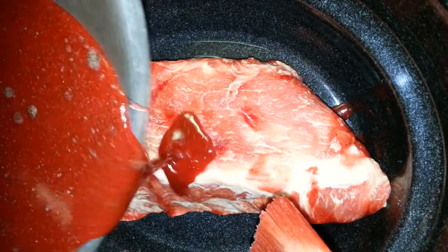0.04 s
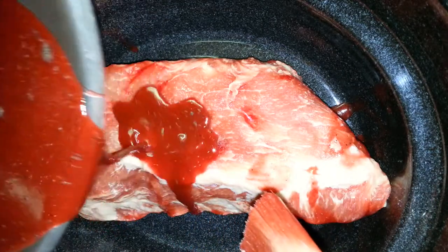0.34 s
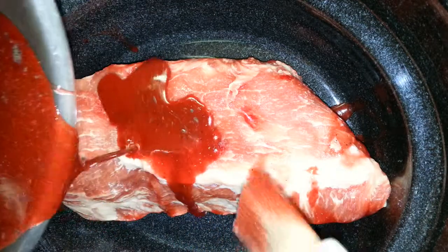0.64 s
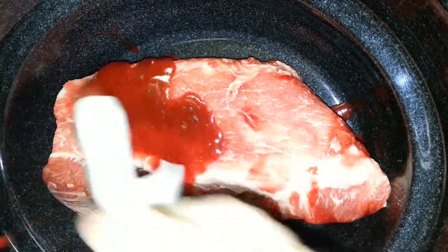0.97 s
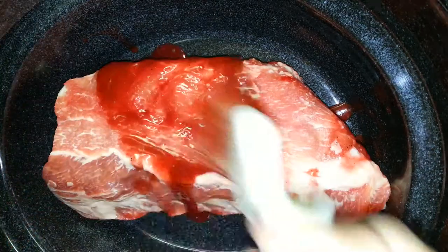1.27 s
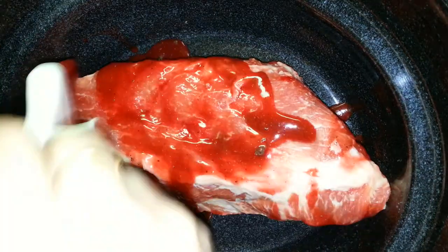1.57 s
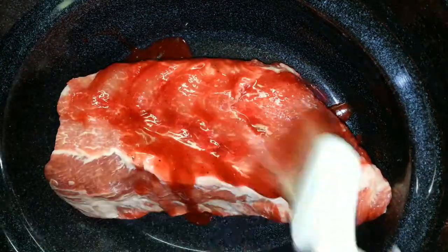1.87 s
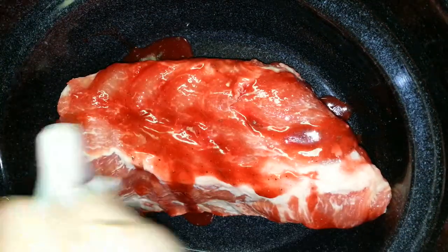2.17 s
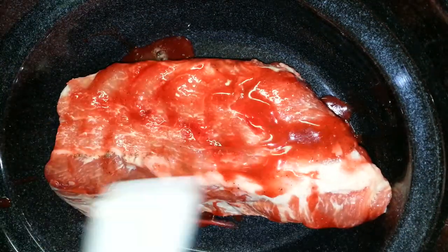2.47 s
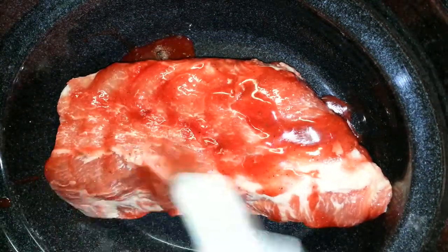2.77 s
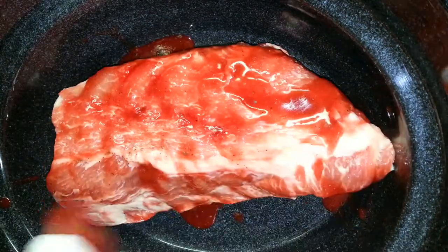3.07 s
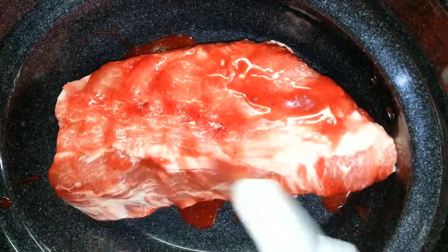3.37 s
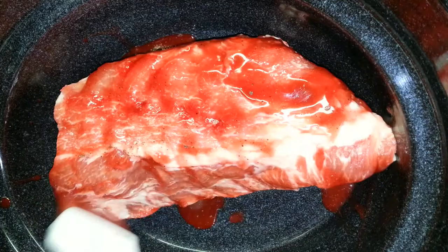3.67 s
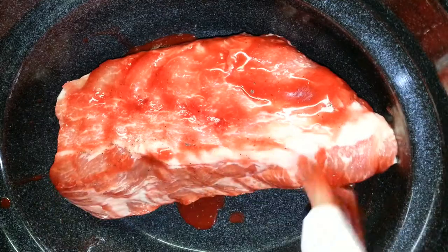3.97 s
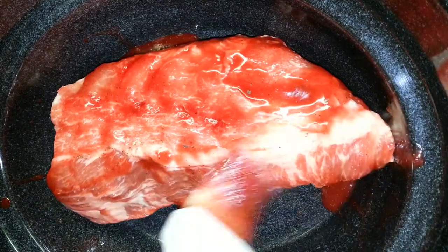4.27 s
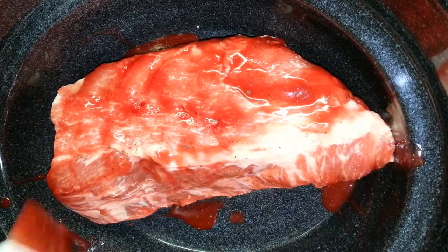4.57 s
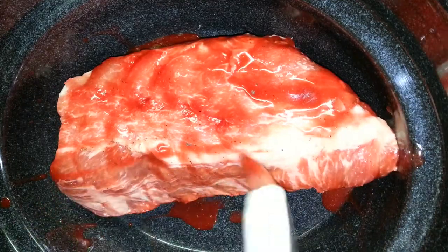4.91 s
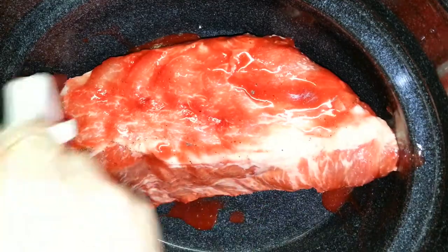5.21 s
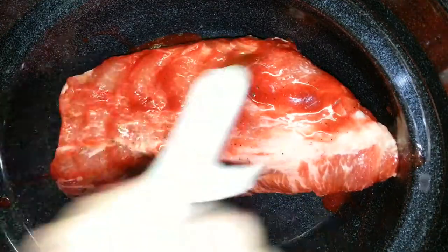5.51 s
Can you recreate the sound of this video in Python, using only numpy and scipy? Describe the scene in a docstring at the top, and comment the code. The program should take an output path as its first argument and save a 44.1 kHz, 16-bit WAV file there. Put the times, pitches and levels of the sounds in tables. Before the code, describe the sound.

Sticky squelches and crisp little snaps as a pastry brush dabs sauce onto meat, with soft knocks on a crock.

```python
"""In a kitchen, close up, a pastry brush spreads thick sauce over raw ribs in a glazed crock.
Each stroke crackles as bristles pull out of the sauce, while wet pockets pop and the meat rubs dully.
Tufts squelch, films of sauce snap, and twice a thin hiss slips in between strokes.
The brush bumps the crock, making it ring, and once judders along it. An appliance hums throughout."""
import sys
import numpy as np
from scipy import signal
from scipy.fft import rfft, irfft
from scipy.io import wavfile
from scipy.ndimage import uniform_filter1d

SR = 44100
rng = np.random.default_rng(int(sys.argv[2]) if len(sys.argv) > 2 else 0)


def wrap_up_sound(samples):
    """Save the sound to the file named by the first command line argument, as 16-bit audio."""
    columns = np.atleast_2d(samples).T
    # keep every value between -1 and 1, then stretch to whole-number steps
    tamed = np.clip(columns, -1, 1)
    steps = np.round(tamed * 32767).astype(np.int16)
    wavfile.write(sys.argv[1], SR, steps)


N = 249165
TIME = np.arange(N) / SR
FFT_SIZE = 2 ** 18
FREQS = np.maximum(np.arange(FFT_SIZE // 2 + 1) * SR / FFT_SIZE, 1)
SUDDEN_DB_PER_S = 7000   # how fast a dab or a judder starts


def from_db(db):
    return 10 ** (np.asarray(db) / 20)


def rms_one(x):
    """Scale a sound to an average power of 1."""
    return x / np.sqrt(np.mean(x ** 2) + 1e-20)


def panned(left_db):
    """Left and right gains, with the left louder by left_db."""
    return from_db(np.vstack([left_db, -left_db]) / 2)


def add(out, s, sound):
    """Mix a short sound in at time s."""
    start = int(s * SR)
    out[:, start:start + sound.shape[-1]] += sound[..., :N - start]


def colour(x, spectrum):
    """Shape the tone to follow (pitch, level) points, with a minimum-phase filter."""
    hz, db = np.transpose(spectrum)
    gain = from_db(np.interp(np.log(FREQS), np.log(hz), db))
    cepstrum = irfft(np.log(gain))
    cepstrum[1:FFT_SIZE // 2] *= 2
    cepstrum[FFT_SIZE // 2 + 1:] = 0   # nothing rings before its cause
    return irfft(rfft(x, FFT_SIZE) * np.exp(rfft(cepstrum)))[..., :N]


def keep_side(x, hz, kind):
    """Keep the "low" or the "high" side of a pitch."""
    return signal.sosfilt(signal.butter(2, hz, kind, fs=SR, output="sos"), x + 1e-18)


def resonate(x, hz, width_hz):
    """Ring at one pitch; a narrower width rings longer."""
    r = np.exp(-np.pi * width_hz / SR)
    feedback = [1, -2 * r * np.cos(2 * np.pi * hz / SR), r * r]
    return signal.lfilter(np.array([1, 0, -1]) * (1 - r * r) / 2, feedback, x + 1e-18)


def drift(per_s):
    """A random wander, about 1 either side of zero."""
    knots = rng.standard_normal(N // 20)
    return np.interp(TIME * per_s, np.arange(len(knots)), knots)


def stereo_noise(side_db):
    """Hiss that sounds wider as side_db rises."""
    mid, side = rng.standard_normal((2, N))
    return mid + from_db(side_db) * side * [[1], [-1]]


def with_echoes(x, wall_db, wall_t60, room_db, room_t60=0.17, size=6000):
    """Sound arrives directly, off the crock's walls and round the kitchen; t60 is seconds to fade 60 dB."""
    t, paths = TIME[:size], 0
    for db, t60 in ((wall_db, wall_t60), (room_db, room_t60)):
        tail = rng.standard_normal((2, size)) * from_db(-60 * t / t60) * (t > 0.0005)
        paths = paths + from_db(db) * rms_one(tail) / np.sqrt(size)
    paths[[0, 1], rng.integers(0, 10, 2)] += 1   # the direct path to each side
    return signal.oaconvolve(x[None], paths, axes=1)[:, :N]


def grains(per_s, spread_db):
    """Tiny bursts at random moments, most weak and a few strong."""
    sizes = from_db(spread_db * np.minimum(rng.exponential(1, N), 4)) * rng.choice([-1, 1], N)
    return rms_one(sizes) * (rng.random(N) < per_s / SR) * np.sqrt(SR / per_s)


def peak_at(s, rise_db_per_s, fall_db_per_s, hold_s=0):
    """A level in dB that rises to 0 at time s, holds and falls."""
    rise = np.minimum(TIME - s, 0) * rise_db_per_s
    fall = np.maximum(TIME - s - hold_s, 0) * fall_db_per_s
    return np.maximum(rise - fall, -200)


# the tones in the hum: (multiple of the mains pitch, level [dB])
HUM_TONES = [(1, -25), (2, -1.5), (3, -9.5), (4, 3), (5, -28), (6, -7), (7, -10), (8, -29)]
# the tone of the room noise: (pitch [Hz], level [dB])
ROOM_TONE = [(20, -17.5), (55, 1), (130, -10.5), (300, -6.5), (480, -17), (700, -23), (1500, -29.5),
             (3000, -32), (7000, -38), (14000, -27.5)]


def kitchen(mains_hz=59.68, hum_db=-61.5, room_db=-60):
    """An appliance hums with the mains current, over faint room noise."""
    hum = 0
    for multiple, db in HUM_TONES:
        lag_s = 0.0004 * rng.standard_normal()
        tone = np.sin(2 * np.pi * multiple * (mains_hz * TIME + lag_s))
        hum = hum + tone * from_db(db + 1.6 * drift(9))
    room = rms_one(colour(stereo_noise(side_db=-9), ROOM_TONE))
    return np.sqrt(2) * hum * from_db(hum_db) + room * from_db(room_db)


# brush strokes: (lands [s], presses hardest [s], lifts [s], crackle [dB], smear [dB], meat drag [dB],
# brightness [dB per octave], left over right [dB])
BRUSH_STROKES = [(0.999, 1.298, 1.455, -37.5, -52, -52, -2, 1.5),
                 (1.667, 1.789, 1.963, -32, -45.5, -52, -0.5, 0), (2.193, 2.307, 2.48, -31, -45, -46, 0, 0),
                 (2.724, 2.791, 2.99, -31, -46.5, -54, 2, -2),
                 (3.264, 3.331, 3.48, -29, -46.5, -51.5, 2.5, -1),
                 (3.805, 3.829, 3.958, -26, -44, -47.5, 2, .5), (4.223, 4.418, 4.56, -33, -48, -57, 3, -3),
                 (4.768, 4.84, 4.96, -28, -43, -53, 3, -1), (5.246, 5.426, 5.58, -33, -49, -54, -1, 1)]


def strokes(landing_db=-14.5, lifting_db=-14, brightening_per_s=12.5):
    """Levels, brightness and left-right balance over time, as the brush lands, presses and lifts."""
    levels = np.full((3, N), -120.0)
    tilts, pans = [], []
    for lands, hardest, lifts, crackle_db, smear_db, drag_db, tilt_db, left_db in BRUSH_STROKES:
        # a power under 1 makes the pressure drop quickly either side of its peak
        off_peak = np.interp(TIME, [lands, hardest, lifts], [1, 0, 1]) ** 0.82
        pressure = off_peak * np.where(TIME < hardest, landing_db, lifting_db)
        pressure += peak_at(lands, rise_db_per_s=501, fall_db_per_s=257, hold_s=lifts - lands)
        stroke = [crackle_db + pressure, smear_db + 0.85 * pressure, drag_db + 0.48 * pressure]
        levels = np.maximum(levels, stroke)
        # the sauce thins along a stroke, so it sounds brighter
        tilts += [(s, tilt_db + brightening_per_s * (s - hardest)) for s in (lands, lifts)]
        pans.append((hardest, left_db))
    return *levels, np.interp(TIME, *np.transpose(tilts)), np.interp(TIME, *np.transpose(pans))


def bristles(level_db, tilt_db, left_db):
    """Bristles peel out of the sauce with a crackle; pressing harder frees more of them."""
    per_s = 340 * from_db(0.5 * (np.maximum(level_db, -55) + 36))
    out = 0
    for hz in np.geomspace(3300, 13500, num=16):
        crackle = resonate(grains(per_s, spread_db=2.5), hz, 0.14 * hz)
        crackle = resonate(crackle, hz, 0.61 * hz)
        shifting_db = 3.8 * drift(60)   # the pockets of sauce keep changing size
        crackle *= from_db(shifting_db + (tilt_db - 1) * np.log2(hz / 6500))
        out = out + with_echoes(crackle, wall_db=0, wall_t60=0.028, room_db=-15)
    clumps_db = 2.15 * drift(120)
    return rms_one(out) * from_db(level_db + clumps_db - 12) * panned(left_db)


def ticks(level_db):
    """Now and then a single sticky bristle lets go with a crisp tick."""
    clicks = resonate(grains(70, spread_db=3), hz=7000, width_hz=8000) * from_db(level_db - 16.5)
    return with_echoes(clicks, wall_db=-6, wall_t60=0.03, room_db=-20.5)


# the tone of sauce popping in the crock: (pitch [Hz], level [dB])
SMEAR_TONE = [(250, -11.5), (480, -3.5), (680, -8.5), (940, 4), (1150, -7), (1380, 1.5), (1580, -2),
              (1850, 0.5), (2450, 0.5), (3200, 2), (5000, -30.5)]


def smear(level_db):
    """Larger pockets of sauce open and sound in the hollow of the crock, each size in its own bursts."""
    out = 0
    for hz in np.geomspace(450, 3200, num=11):
        pops = resonate(grains(300, spread_db=4), hz, 0.15 * hz)
        pops *= from_db(4.35 * drift(40)) / np.sqrt(hz)
        out = out + with_echoes(pops, wall_db=6.5, wall_t60=0.019, room_db=-1)
    return rms_one(colour(out, SMEAR_TONE)) * from_db(level_db - 4.5)


# the tone of rubbed meat: (pitch [Hz], level [dB])
MEAT_TONE = [(25, -35.5), (60, -3.5), (100, 8), (220, -3.5), (330, 6), (480, -14), (700, -13.5),
             (1500, -38)]


def meat_drag(level_db):
    """The brush drags over the meat with a low, dull rub."""
    rubbing = colour(stereo_noise(side_db=-14), MEAT_TONE)
    return rms_one(rubbing) * from_db(level_db - 4.5)


# tufts peeling off the sauce: (peak time [s], crackle [dB], smear [dB], swell [dB per s])
PEELING_TUFTS = [(1.08, -42, -51.5, 150), (1.278, -30, -49.5, 350), (1.718, -37, -46, 202),
                 (1.921, -25.5, -42.5, 279), (2.293, -26.5, -41, 450), (2.801, -26, -40, 449.5),
                 (2.962, -35, -45, 250), (3.348, -24, -46, 350), (3.814, -26.5, -47, 900),
                 (4.507, -29.5, -46, 199), (4.835, -25, -42, 500), (5.357, -23, -40, 800),
                 (5.394, -19, -36, 599.5), (5.51, -29.5, -45.5, 298.5)]


def squelches(let_go_db_per_s=546.5):
    """Crackle and smear levels that swell as a tuft of bristles peels off, then drop as it lets go."""
    return np.max([np.vstack(levels) + peak_at(s, swell, let_go_db_per_s)
                   for s, *levels, swell in PEELING_TUFTS], axis=0)


# films of sauce snapping: (time [s], strength [dB], pitch [Hz], left over right [dB])
FILM_SNAPS = [(1.1464, -28, 4600, 0), (1.346, -20.5, 10100, -5), (1.3657, -20, 10200, -2),
              (1.417, -28.5, 5830, 1), (1.4772, -28, 11700, -4), (1.649, -29, 5040, -1),
              (1.777, -6.5, 4900, 9), (1.8216, -1, 8970, 8), (1.8262, -11, 7040, 9),
              (1.8665, -24, 5230, 11), (1.875, -19.5, 4550, -2), (2.3644, -9, 5540, 1),
              (2.37, -7.5, 4570, 6.5), (2.6876, -18, 6700, 5), (2.7611, -18.5, 7860, -3),
              (2.7956, -16.5, 7160, 0), (2.8, -15.5, 7800, 6), (2.8376, -8.5, 10600, -1),
              (3.2332, -22.5, 10800, -4.5), (3.2705, -16.5, 9800, -1), (3.332, -18, 8800, -14.5),
              (3.382, -17, 7000, -9), (3.5067, -32, 6300, 0), (3.7308, -25, 5906, 7.5),
              (3.8376, -13.5, 7200, -3), (3.851, -17.5, 7600, -5), (3.8852, -19.5, 6900, 0),
              (3.893, -14, 10800, -6), (3.9367, -39, 7700, 7), (4.0087, -30.5, 7240, -11),
              (4.381, -19.5, 5860, -5), (4.4, -18, 5200, -2), (4.4573, -16.5, 7200, -5),
              (4.808, -12.5, 5760, -3), (4.8278, -9, 5200, -1), (4.8941, -13.5, 10600, -2),
              (5.2618, -29, 10200, 1), (5.4472, -16, 5670, -4), (5.4517, -16.5, 7700, 0),
              (5.4822, -13, 5360, 7), (5.5105, -14, 6400, 4.5)]


def snaps(size=300):
    """A film of sauce tears within a millisecond and rings its small pocket, with a faint lower smack."""
    out, t = np.zeros((2, N)), TIME[:size]
    for s, db, hz, left_db in FILM_SNAPS:
        tear = signal.unit_impulse(size) + 0.39 * rng.standard_normal(size) * np.exp(-t / 0.00022)
        pocket = resonate(resonate(tear, hz, width_hz=4200), hz, width_hz=11550)
        smack = resonate(tear, hz=2300, width_hz=1500)
        snap = pocket + from_db(-13) * smack
        heard = with_echoes(snap / np.linalg.norm(snap), wall_db=-1.5, wall_t60=0.038, room_db=-17.5)
        add(out, s, heard * from_db(db - 1) * panned(left_db))
    return out


# the crock's notes, damped by the meat: (pitch [Hz], level [dB], time to fade 60 dB [s])
CROCK_NOTES = [(110, -24, 0.053), (185.3, -12.5, 0.32), (272.6, -0.5, 0.095), (350, -0.5, 0.026),
               (478, 4, 0.041), (582, 4, 0.017), (732, -6, 0.052), (854, -1.5, 0.046), (913.5, 2.5, 0.048),
               (1182, -22, 0.098), (1320, -7.5, 0.046), (1643, -20, 0.036), (1942, 1, 0.043)]
# bumps on the crock: (time [s], peak level [dB], treble limit [Hz], bass limit [Hz])
BRUSH_BUMPS = [(1.214, -38, 138, 60), (1.333, -39.5, 1010, 710), (1.69, -36, 774, 380),
               (1.777, -25, 1040, 756), (1.824, -33.5, 1020, 626), (1.866, -29.5, 1600, 500),
               (2.212, -18.5, 358, 189), (2.216, -27.5, 173, 115), (2.229, -25.5, 300, 160),
               (2.268, -27, 338, 192), (2.388, -37, 300, 150), (2.447, -35, 337, 150),
               (2.68, -44, 307, 150), (2.798, -39.5, 1490, 900), (2.891, -17, 443, 210),
               (3.263, -26.5, 1430, 337), (3.28, -34, 1940, 414), (3.744, -35.5, 820, 286),
               (4.769, -21.5, 1850, 347), (4.796, -36.5, 132, 70.6), (4.806, -33.5, 161, 80),
               (5.098, -57, 1004, 384), (5.355, -38.5, 1095, 840), (5.385, -46, 920, 920),
               (5.447, -37.5, 1600, 900)]


def bumps(size=11000):
    """The brush bumps the crock through the meat and rings all its notes, each with its own strength."""
    out, t = np.zeros((2, N)), TIME[:size]
    hz, db, t60 = np.array(CROCK_NOTES).T[:, :, None]
    for s, peak_db, treble_hz, bass_hz in BRUSH_BUMPS:
        strength = from_db(db + 1.5 * rng.standard_normal(hz.shape))
        notes = strength * from_db(-60 * t / t60) * np.sin(2 * np.pi * hz * t)
        ring = keep_side(keep_side(notes.sum(0), treble_hz, "low"), bass_hz, "high")
        heard = with_echoes(ring, wall_db=-14, wall_t60=0.018, room_db=-12.5)
        add(out, s, heard / np.abs(heard).max() * from_db(peak_db))
    return out


# hisses between strokes: (peak time [s], length [s], pitch [Hz], glide [Hz per s], level [dB])
THIN_HISSES = [(1.463, 0.1, 5890, -11000, -58.5), (2.151, 0.31, 5850, 3699, -59)]


def hisses():
    """A thin, gliding hiss swells and fades."""
    rumble = rms_one(keep_side(stereo_noise(side_db=-3.5), 450, "low"))
    tones = 0
    for s, length_s, hz, glide, db in THIN_HISSES:
        t = TIME - s
        swell = np.exp(-np.minimum((2 * t / length_s) ** 2, 20))
        tones = tones + np.sin(2 * np.pi * (hz + glide * t / 2) * t) * swell * from_db(db - 3.5)
    return rumble * tones   # multiplying moves the noise up to each tone's pitch


# light touches of the brush: (time [s], crackle [dB], smear [dB], fade [dB per s])
LIGHT_DABS = [(1.647, -36, -47.5, 449.5), (2.106, -47.5, -61, 88.5), (2.52, -49, -61.5, 66.5),
              (2.686, -46, -55, 250), (3.212, -46.5, -60, 130), (3.504, -44, -57.5, 191.5),
              (3.729, -45, -49.5, 223), (4.007, -41, -54, 190.5), (4.175, -48.5, -64.5, 20),
              (4.606, -42, -57, 191.5), (4.70, -53, -65, 61), (5.097, -37.5, -50, 130),
              (5.175, -44.5, -59.5, 59.5), (5.259, -41, -53, 101), (5.599, -45.5, -65.5, 89.5)]


def dabs():
    """Crackle and smear levels that jump as the brush dabs the sauce, then die away."""
    return np.max([np.vstack(levels) + peak_at(s, SUDDEN_DB_PER_S, fade)
                   for s, *levels, fade in LIGHT_DABS], axis=0)


def judder(start_s=2.891, hz=488, db=-40):
    """The brush sticks and slips in step with one note of the crock: a short, rough groan."""
    level_db = db + peak_at(start_s, SUDDEN_DB_PER_S, fall_db_per_s=260, hold_s=0.099)
    phase = 2 * np.pi * np.cumsum(hz * (1 + 0.055 * drift(700))) / SR
    overtones = sum(np.sin(k * phase) * (0.5 + 0.8 * drift(150)) for k in (2, 3, 4))
    groan = (np.sin(phase) + from_db(-22) * overtones) * from_db(3 * drift(130))
    slips = resonate(grains(400, spread_db=0), hz=360, width_hz=276)
    slips = resonate(slips, hz=370, width_hz=380)
    return (rms_one(groan) + from_db(-5) * rms_one(slips)) * from_db(level_db)


def scene():
    """Brush, meat and crock in the humming kitchen."""
    crackle_db, smear_db, drag_db, tilt_db, left_db = strokes()
    # at each moment the loudest of stroke, squelch and dab sets the level
    crackle_db, smear_db = np.max([(crackle_db, smear_db), squelches(), dabs()], axis=0)
    meat = meat_drag(drag_db)
    sauce = bristles(crackle_db, tilt_db, left_db) + ticks(crackle_db) + smear(smear_db) + snaps()
    return meat + sauce + hisses() + bumps() + judder() + kitchen()


def suppress_noise(x, open_db=-42.5, slope=0.55, deepest_db=-9):
    """A noise suppressor turns the sound down whenever little is heard above the hum's pitch."""
    treble = keep_side(x, 810, "high")
    power = uniform_filter1d(np.mean(treble ** 2, axis=0), size=1300)
    level_db = 10 * np.log10(np.abs(power) + 1e-12)
    return x * from_db(np.clip(slope * (level_db - open_db), deepest_db, 0))


# the two microphone openings ring at different pitches: (pitch [Hz], left [dB], right [dB])
MIC_OPENINGS = [(300, 0.5, 2), (610, 5.5, 2.5), (1107, 6.5, -1.5), (1790, 8, 3), (3180, 5.5, 5),
                (4230, 10, 8.5), (4870, 14.5, 9), (6070, 10, 12.5), (6740, 3.5, 18), (7300, 8, 21),
                (8450, 3.5, 12.5), (9790, 2.5, 9.5), (10700, 3.5, 5), (15500, -1, -1.5)]


def record(dry, cutoff_hz=14750):
    """Each opening colours its side; quiet moments dip, loud peaks are rounded and the top is cut."""
    openings = np.array(MIC_OPENINGS)
    left = colour(dry[0], openings[:, [0, 1]])
    right = colour(dry[1], openings[:, [0, 2]])
    rounded = np.tanh(suppress_noise(np.array([left, right])))
    return signal.sosfilt(signal.ellip(10, 0.2, 70, cutoff_hz, fs=SR, output="sos"), rounded)


dry = scene()
out = record(dry)
wrap_up_sound(out)
```